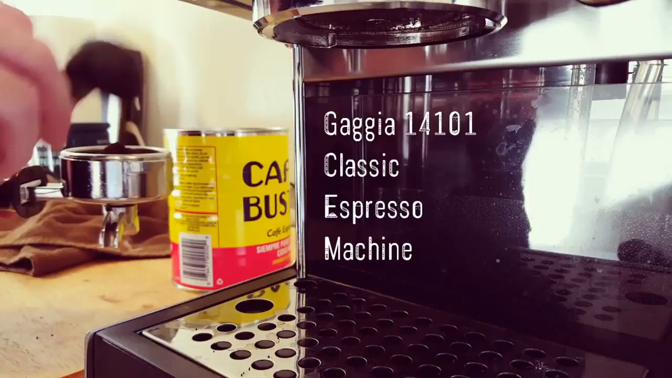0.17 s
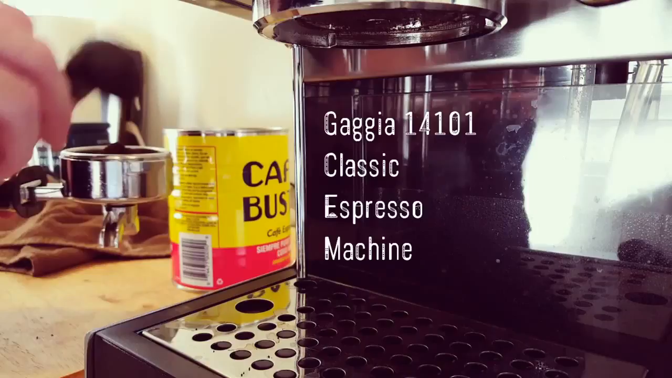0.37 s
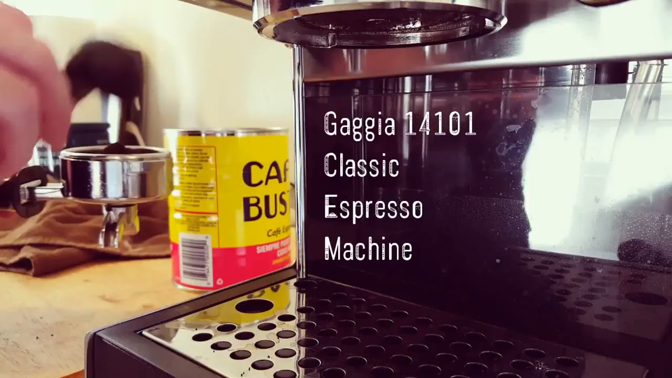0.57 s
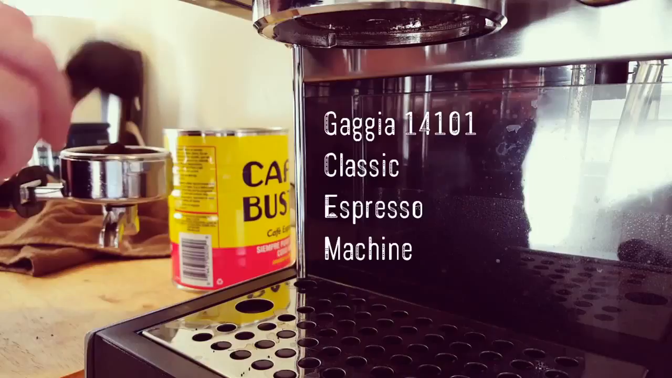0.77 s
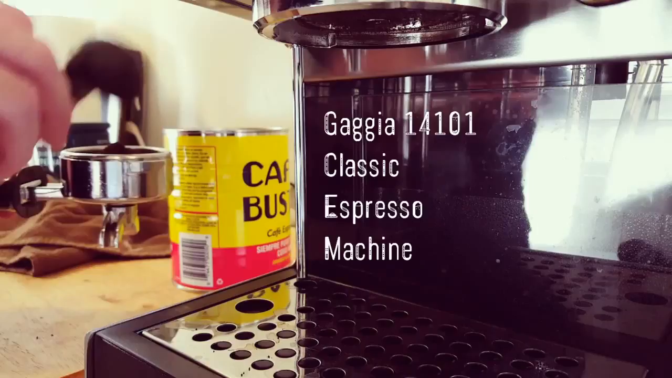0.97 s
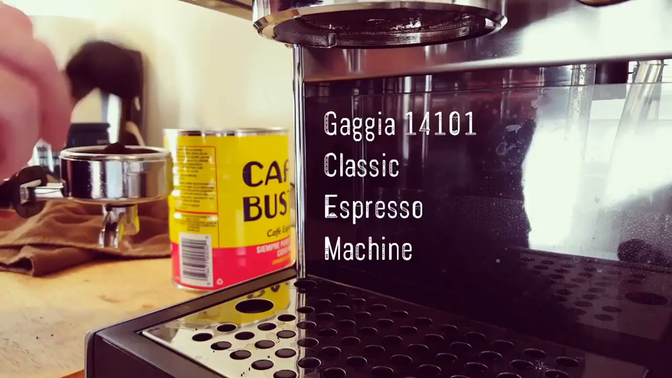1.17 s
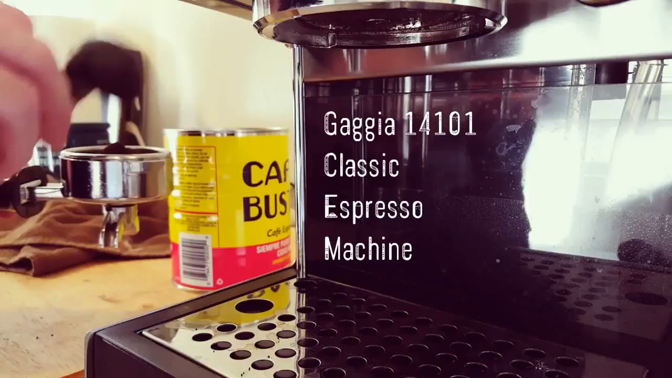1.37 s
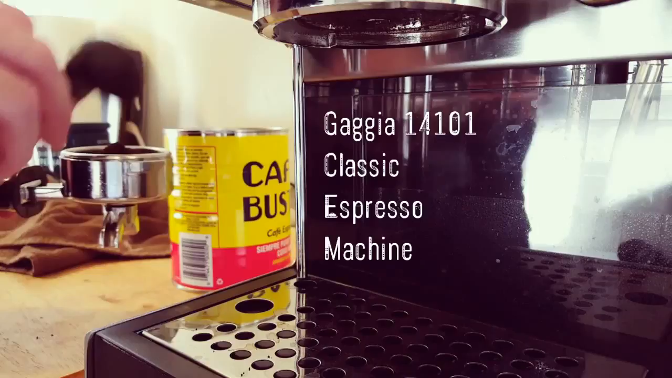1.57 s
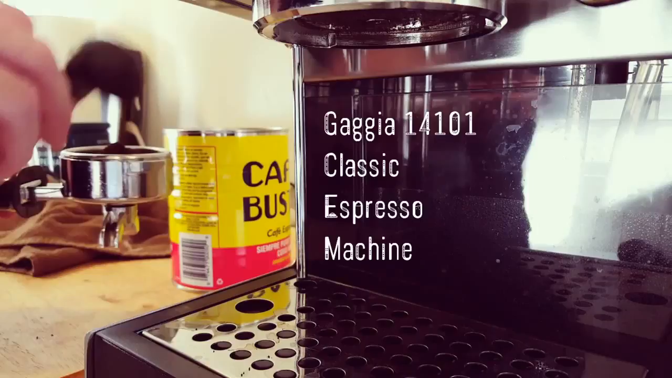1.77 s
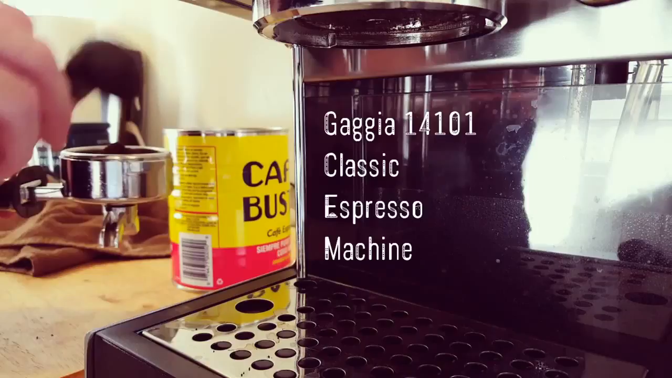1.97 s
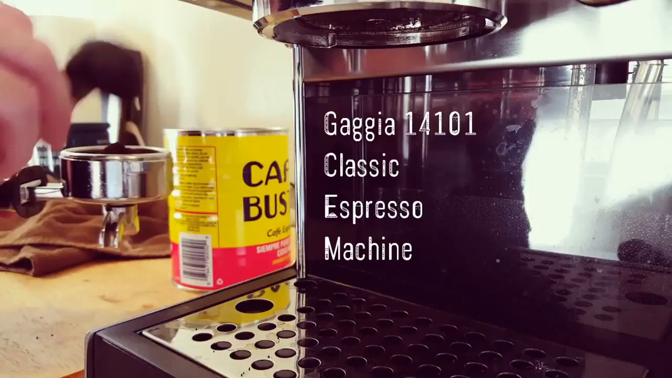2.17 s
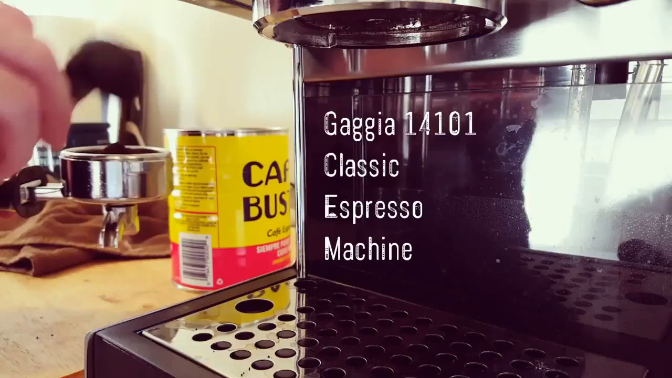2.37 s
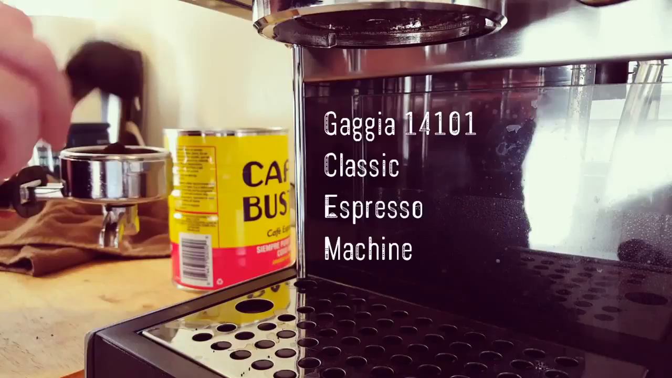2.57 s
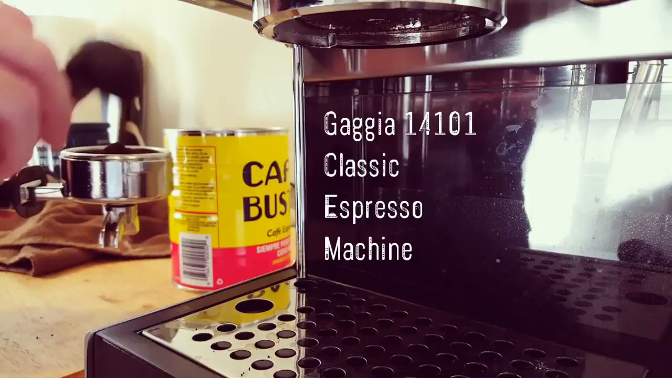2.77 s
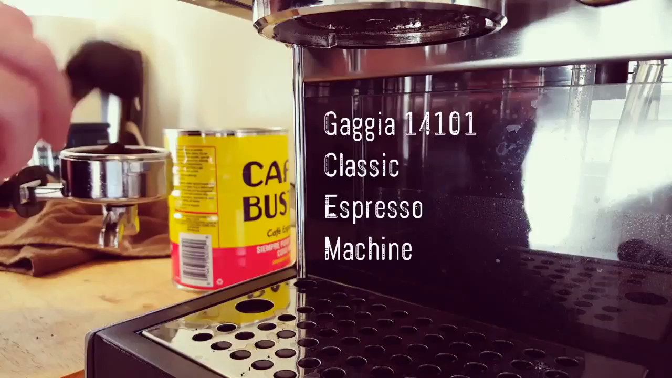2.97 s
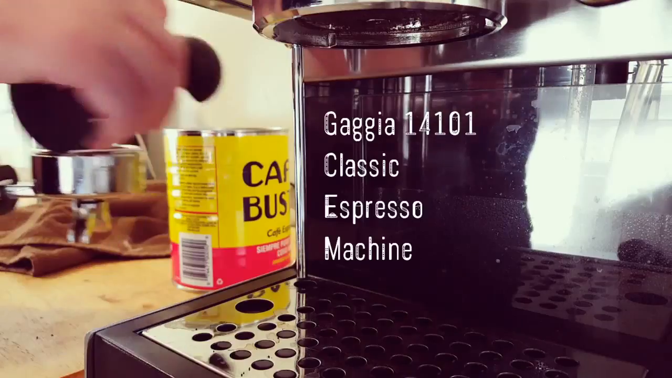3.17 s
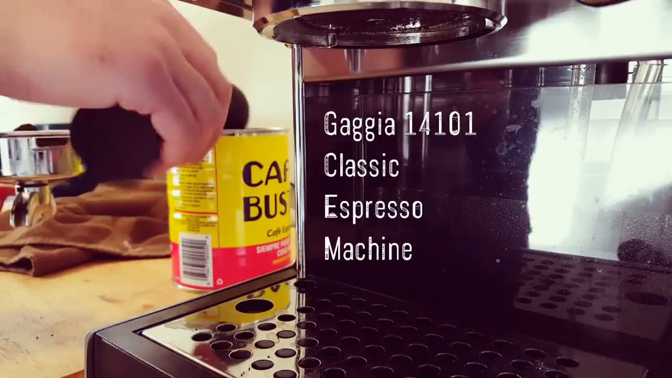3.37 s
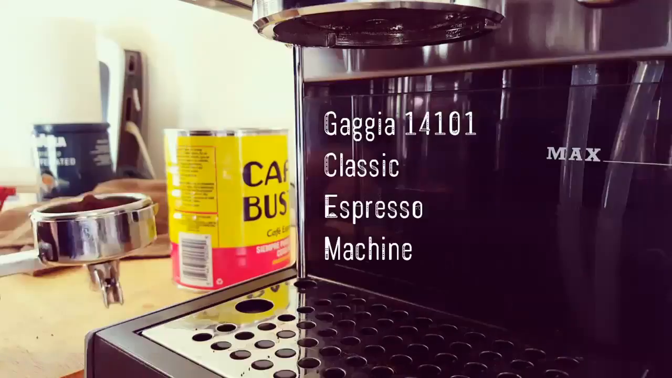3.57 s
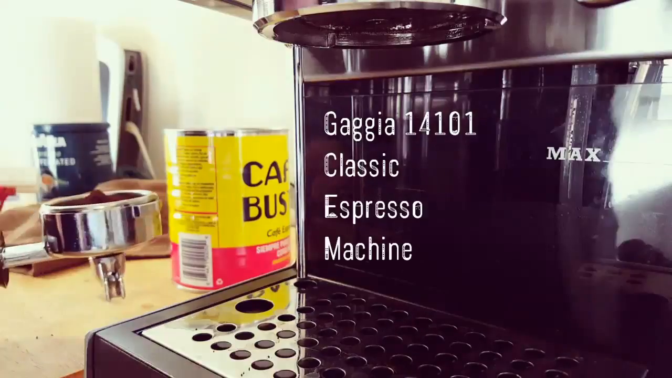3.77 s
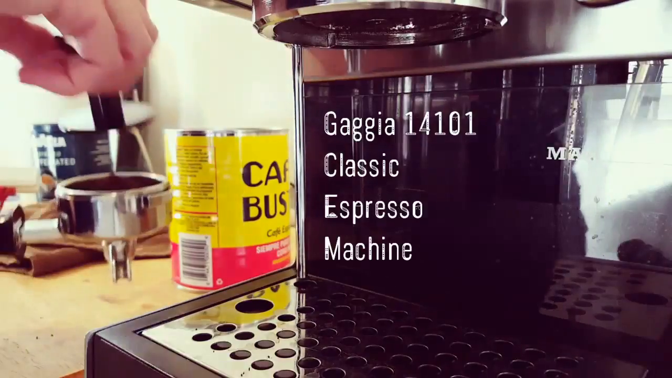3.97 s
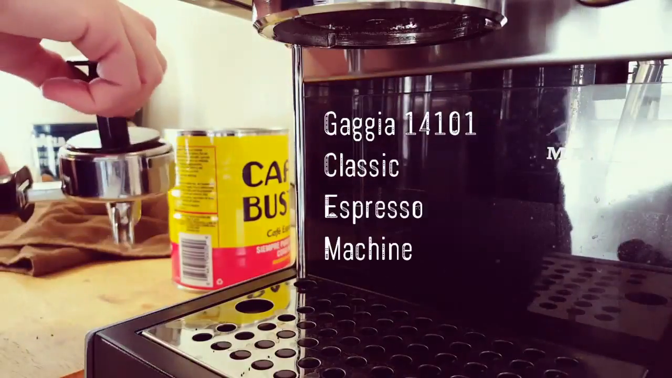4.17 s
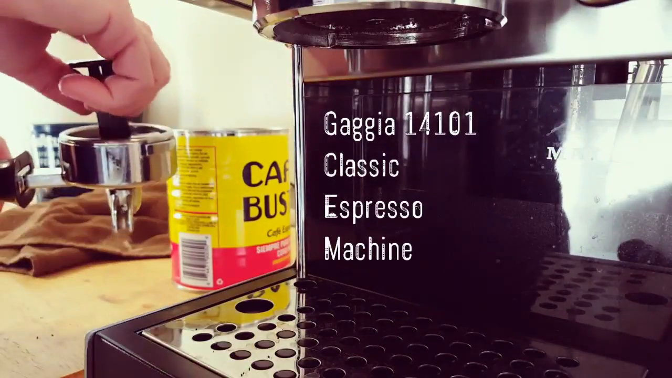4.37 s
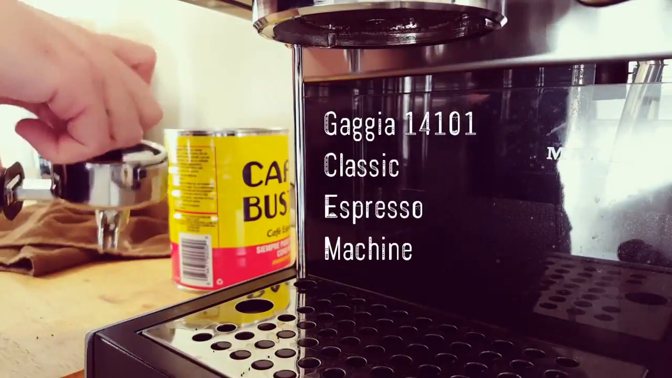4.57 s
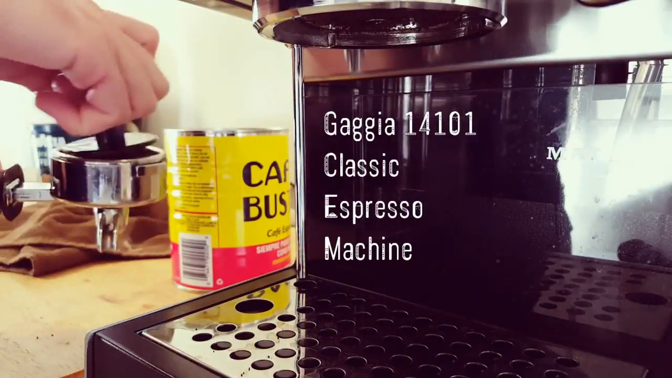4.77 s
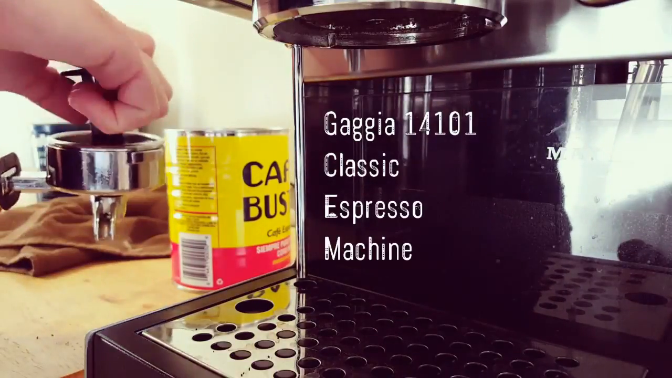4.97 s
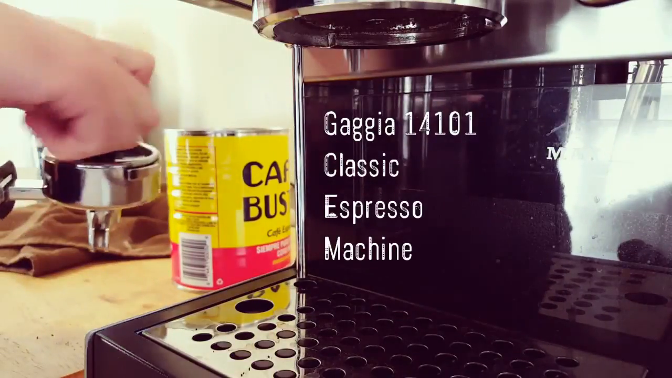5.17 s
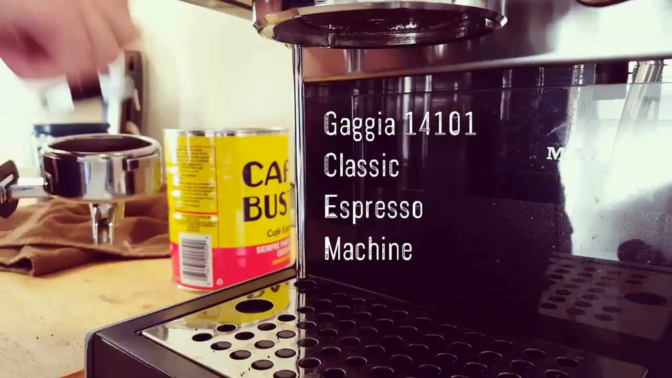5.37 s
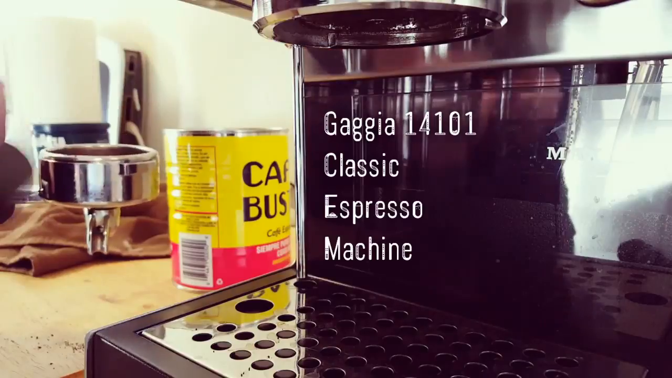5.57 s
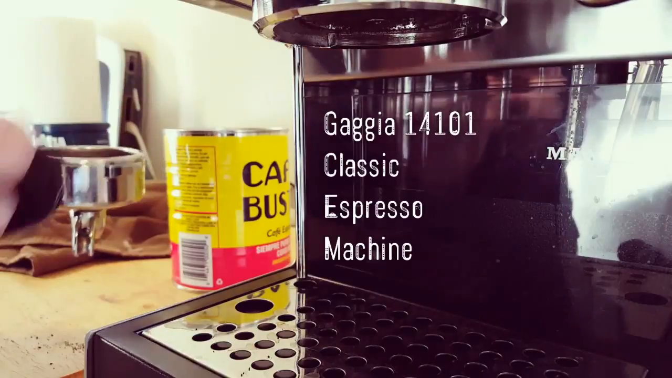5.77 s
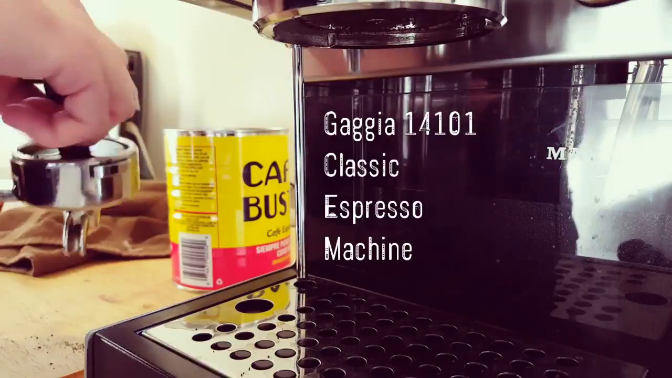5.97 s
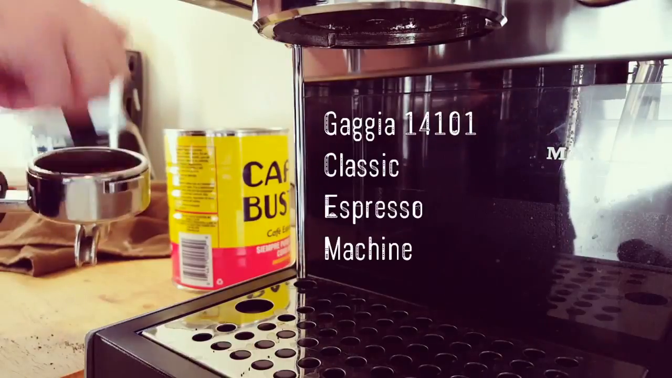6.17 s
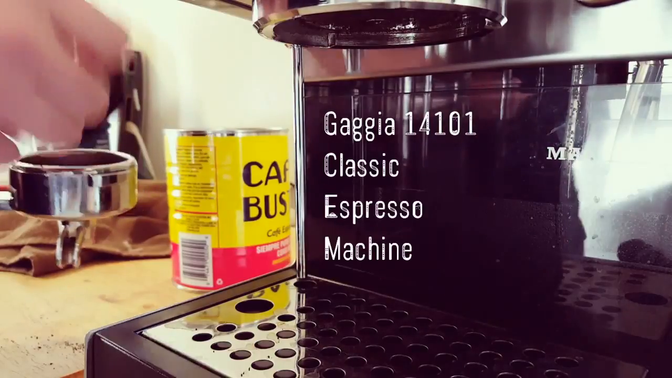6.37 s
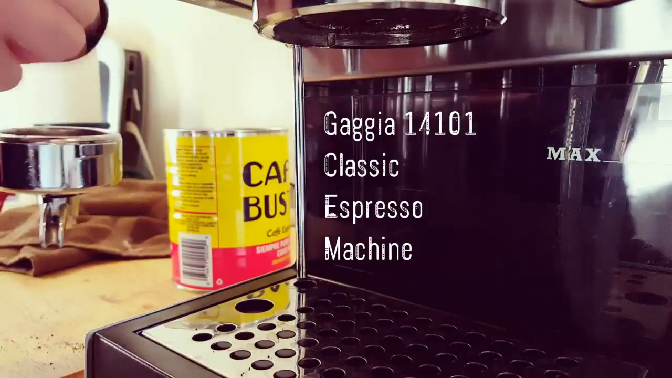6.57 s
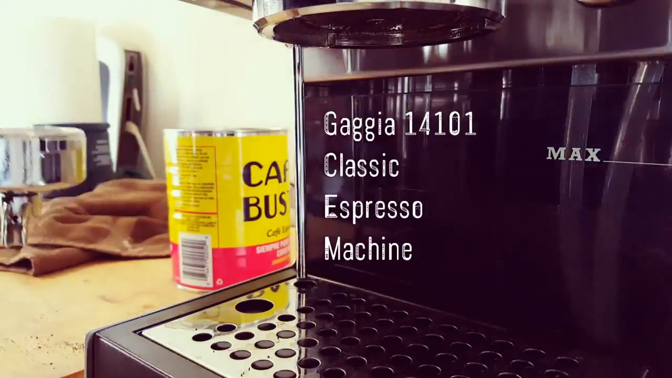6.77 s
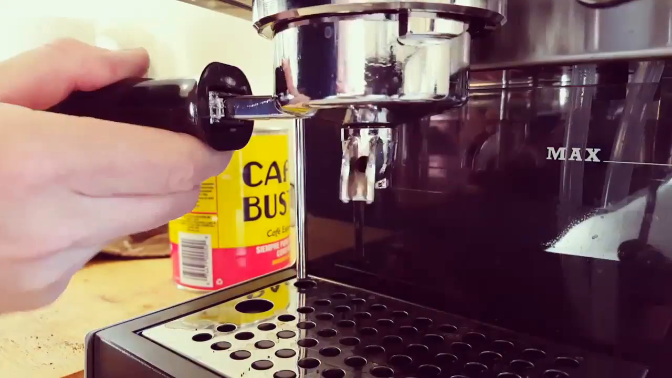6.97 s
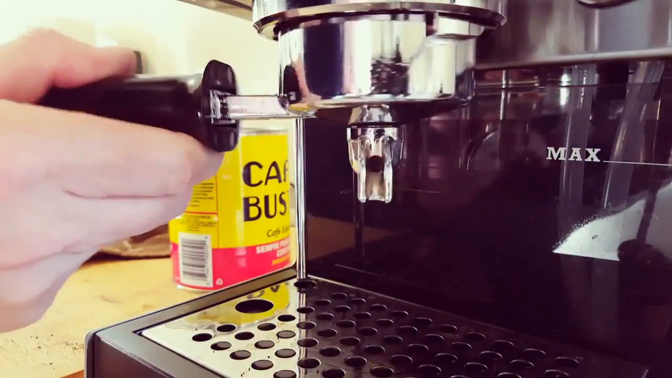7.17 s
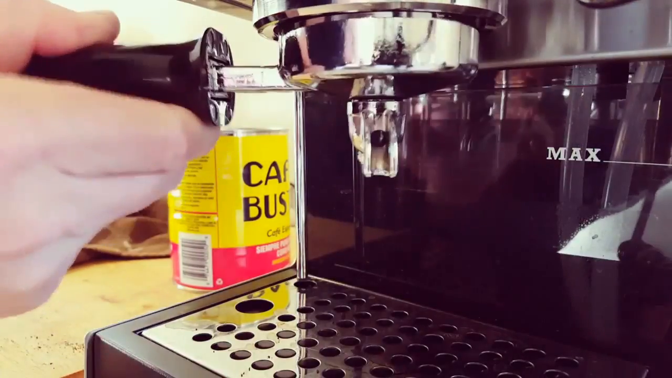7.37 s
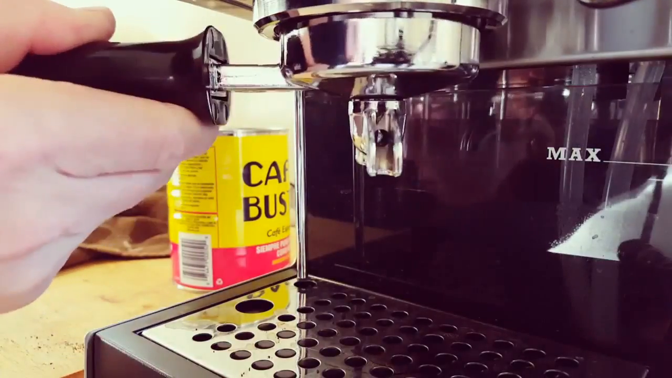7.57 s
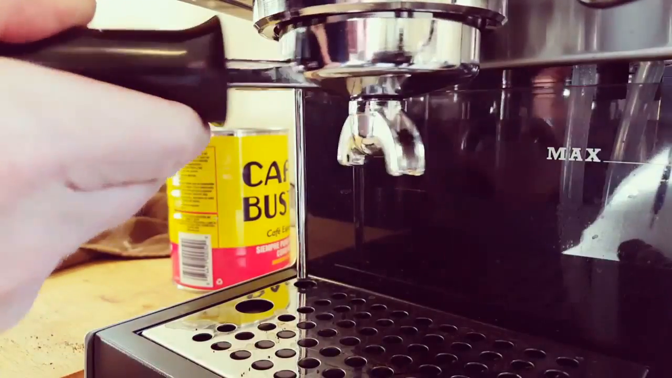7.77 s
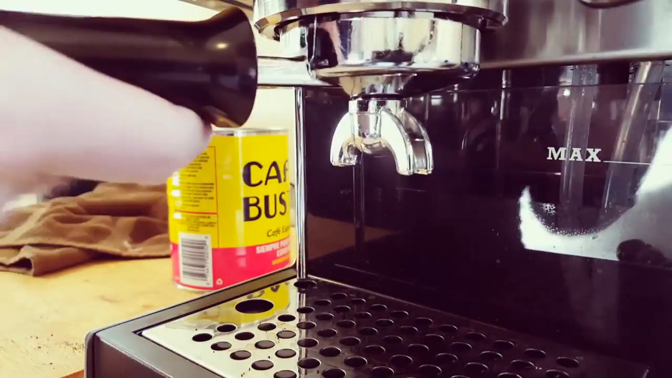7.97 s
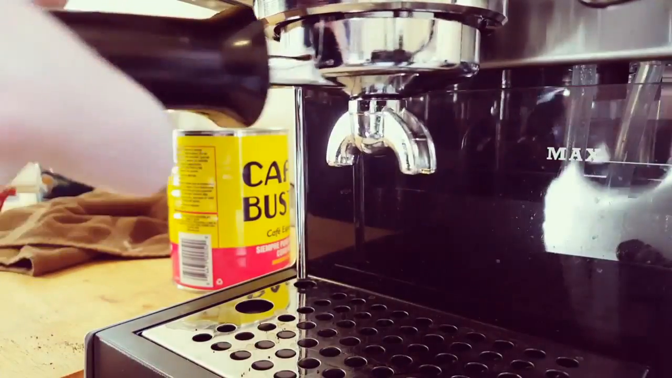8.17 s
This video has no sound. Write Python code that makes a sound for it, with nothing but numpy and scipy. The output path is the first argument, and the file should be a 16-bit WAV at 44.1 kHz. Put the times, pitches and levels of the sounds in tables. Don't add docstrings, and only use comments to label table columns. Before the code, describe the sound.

Close stereo pickup over a wooden counter: soft knocks and gritty rustles, then sharp scoop taps with a brief steel ring, growing harder and ending dull. A low drag follows, with small ticks and one bright tamper hit. The background suddenly shifts to fuller, lower air beside the machine, where heavy metal parts strike, twist with a rasp, stop hard, and get one last push. Refrigerator hum throughout.

```python
import sys
import numpy as np
from scipy import signal
from scipy.fft import rfft, irfft, next_fast_len
from scipy.io import wavfile
from scipy.ndimage import uniform_filter1d, map_coordinates

SR = 44100
rng = np.random.default_rng(int(sys.argv[2]) if len(sys.argv) > 2 else 0)


def materialize(psi):
    bounded = np.clip(np.atleast_2d(psi).T, -1, 1)
    quanta = np.round(bounded * 32767).astype(np.int16)
    wavfile.write(sys.argv[1], SR, quanta)


def gain_from_db(level_db):
    decades = np.asarray(level_db, float) / 20
    return 10 ** decades


N = 362502
TIME_S = np.arange(N) / SR
START_S, CUT_S = 0.037, 6.95
STEADY_TOP_HZ = 15870

# f/Hz, likeness [-1..1]
ALIKE = [(60, 0.58), (180, 1), (550, 0.76), (1650, 0.25), (4970, -0.12), (15000, -0.025)]


def unit(x):
    return x / np.sqrt(np.mean(x ** 2) + 1e-20)


def along(points, hz):
    f, v = np.transpose(points)
    return np.interp(np.log(hz + 1), np.log(f + 1), v)


def wobble(rate):
    knots = rng.standard_normal(int(N * rate / SR) + 4)
    return map_coordinates(knots, [np.arange(N) * rate / SR])


def filtered(x, response):
    m = next_fast_len(x.shape[-1] + 8192)
    return irfft(rfft(x, m) * response(np.fft.rfftfreq(m, 1 / SR)), m)[..., :x.shape[-1]]


def body(modes):
    def response(f):
        total = 0
        for k, (hz, width, db) in enumerate(modes):
            damping = 1j * f * abs(width)
            total = total + (-1) ** k * gain_from_db(db) * damping / (hz * hz - f * f + damping + 1e-9)
        return total
    return response


def twice(modes):
    return lambda f: sum(body([(hz, 1.5 * width, 0)])(f) ** 2 * gain_from_db(db) for hz, width, db in modes)


def strokes(rows, rise, fall):
    gain = 0
    for s, hold, db in rows:
        early = np.clip(s - TIME_S, 0, None)
        past = np.clip(TIME_S - s - hold, 0, None)
        gain = gain + gain_from_db(db - rise * early - fall * past)
    return gain


def spread(pair, alike):
    def mix(hz):
        turn = np.arccos(np.clip(along(alike, hz), -1, 1)) / 2
        return np.array([np.cos(turn), np.sin(turn)])
    mid, side = filtered(pair, mix)
    return np.array([mid + side, mid - side])


def noise(response, alike, grain_db):
    grit = gain_from_db(grain_db * wobble(220))
    rough = filtered(grit * rng.standard_normal((2, N)), lambda f: response(f) * (f < STEADY_TOP_HZ))
    return unit(spread(rough, alike))


# f/Hz, t60/s
WALLS = [(200, 0.13), (1000, 0.19), (4000, 0.15), (9000, 0.14), (16000, 0.11)]


def room_tail(onset_s):
    n = SR // 4
    hz, t, z = signal.stft(rng.standard_normal((2, n)), SR, nperseg=128)
    decay = gain_from_db(-60 * t / along(WALLS, hz)[:, None])
    tail = signal.istft(z * decay, SR, nperseg=128)[1][:, :n]
    tail = spread(tail * (1 - np.exp(-np.arange(n) / SR / onset_s)), ALIKE)
    return tail / np.linalg.norm(tail[0])


# left delay/s, right delay/s, level/dB
ECHOES = [
    (.00068, .00064, -10),
    (.0014, .0012, -10),
    (.0037, .0039, -12),
]


def add(out, s, db, tail_db, response, lead_s, beam=(5000, 1000, -40)):
    size = 2 ** 14
    hz = np.fft.rfftfreq(size, 1 / SR)
    left_s, right_s, echo_db = np.transpose(ECHOES)
    echoes = gain_from_db(echo_db + rng.normal(0, 1.5, (2, len(ECHOES))))
    paths = [1 + gains @ np.exp(-2j * np.pi * np.outer(lags, hz))
             for gains, lags in zip(echoes, (left_s, right_s))]
    paths = paths * np.exp(-2j * np.pi * np.outer([0, lead_s], hz))
    paths = paths * (1 + body([beam])(hz)) / (1 + 1j * hz / 11000)
    steady = hz < STEADY_TOP_HZ
    t = np.arange(SR // 20) / SR
    scatter = rng.standard_normal((2, len(t))) * gain_from_db(-60 * t / 0.0126) * (t > .0012)
    scatter = spread(scatter, ALIKE)
    scatter = rfft(scatter / np.linalg.norm(scatter[0]), size)
    paths = paths + gain_from_db(-7) * steady * hz / (hz - 5000j) * scatter
    paths = paths + gain_from_db(tail_db) * steady * rfft(room_tail(onset_s=0.006), size)
    ring = response(hz)
    sound = irfft(paths * ring) / abs(irfft(ring)).max()
    spot = out[:, round(s * SR):][:, :SR // 3]
    spot += gain_from_db(db) * sound[:, :spot.shape[1]]


def hum(lines, sway_db):
    out = np.zeros((2, N))
    for hz, db in lines:
        loose = 0.6 + 0.42 / (1 + (hz / 1100) ** 2)
        phase = 2 * np.pi * hz * TIME_S + 2.1 * loose ** 2 * wobble(8) + rng.uniform(0, 6.76)
        apart = rng.normal(0, 1.0) * hz / 1500
        level = gain_from_db(db + 2.0 + sway_db * loose * wobble(9))
        out += level * np.sin(phase + np.array([[0], [apart]]))
    return out


# f/Hz, level/dB rms
HUM = [(209.9, -60), (236.9, -53), (285.3, -53.5), (355.3, -61.5), (425.3, -61), (473.7, -58.5),
       (721.4, -61.5), (829.0, -62), (1061, -66), (1157, -66.5), (1647, -69.5), (2239, -94), (2724, -66),
       (2945, -81), (3887, -77)]
HUM_LATE = [(140.0, -53), (177.6, -73), (527.6, -85), (823.6, -66.5), (1362, -68), (2094, -83)]
# f/Hz, width/Hz, level/dB
BUZZ = [(117.3, 6.7, -1.5), (1165, 84, -2), (1655, 48, -16), (2750, 160, -33)]
# f/Hz, level/dB per Hz
AIR = [(12, -65), (20, -9.5), (29, -33), (108, -21), (174, -16.5), (224, -8.5), (281, -5), (382, -9),
       (465, -12.5), (709, -10), (1510, -21.5), (2660, -23), (3520, -28), (8000, -33), (9500, -38),
       (15200, -36.5), (15900, -44), (16300, -77)]
AIR_LATE = [(12, -61), (20, -27), (143, 1), (281, -6), (479, -10), (551, -7.5), (750, -18.5), (1320, -19),
            (1690, -25.5), (2060, -24.5), (2890, -27.5), (12500, -44.5), (15800, -46), (16300, -72)]
# f/Hz, likeness [-1..1]
ALIKE_LATE = [(60, 0.98), (180, 0.96), (550, 0.56), (1650, -0.31), (4970, -0.18), (15000, 0.3)]
# t/s, level/dB
SETTLING = [
    (6.95, 1.5),
    (7.3, 0),
    (7.6, -1),
    (7.95, 0),
    (8.22, -0.5),
]


def kitchen():
    late = np.clip((TIME_S - CUT_S) / 0.0034, 0, 1)
    air = noise(lambda f: gain_from_db(along(AIR, f)), ALIKE, grain_db=1.0)
    first = gain_from_db(-49.5 + .4 * wobble(3)) * air + hum(HUM, sway_db=2.0)
    first += gain_from_db(-60.0) * noise(twice(BUZZ), ALIKE, grain_db=4.0)
    air = noise(lambda f: gain_from_db(along(AIR_LATE, f)), ALIKE_LATE, grain_db=1.5)
    settling_db = np.interp(TIME_S, *np.transpose(SETTLING))
    second = gain_from_db(-45.5 + settling_db + 0.65 * wobble(2.98)) * air + hum(HUM_LATE, sway_db=-3)
    return (1 - late) * first + late * second


# t/s, hold/s, level/dB
RUSTLE = [(.05, .005, -53), (.27, .005, -59), (1.25, 0.11, -70), (1.6, .02, -77), (1.71, 0.11, -61),
          (3.8, 0.14, -56.5), (4.02, 0.067, -62), (4.16, .02, -75), (4.61, 0.018, -61), (4.745, .01, -59),
          (5.17, 0.02, -56), (5.28, .015, -56), (6.12, .005, -64), (6.165, 0.039, -56.5),
          (6.31, 0.027, -58), (7.66, .005, -63), (7.72, 0.092, -62.5), (7.9, 0.068, -54.5),
          (8.05, 0.018, -61), (8.12, 0.14, -66.5)]
# f/Hz, level/dB per Hz
RUSTLE_COLOUR = [(2000, 2), (4000, -1.5), (6500, 1.5), (9500, -7.5), (13000, -4), (15500, -14),
                 (16200, -40)]


def rustle():
    rub = strokes(RUSTLE, rise=260, fall=280)
    return rub * noise(lambda f: gain_from_db(along(RUSTLE_COLOUR, f)), ALIKE, grain_db=2.5)


# t/s, peak level/dB
KNOCKS = [
    (0.089, -35),
    (0.099, -39),
    (0.112, -33),
    (0.1768, -23.5),
    (0.1808, -28),
    (0.204, -37),
    (0.281, -35.5),
    (1.6005, -25.5),
    (1.604, -36),
]
# f/Hz, width/Hz, level/dB
COUNTER = [(318, 71, -4), (453, 77, 2), (707, 79, -3.5), (864, 150, -5.5), (1160, 82, -34),
           (1950, 150, -10)]
# t/s, hold/s, level/dB
SLIDE = [
    (3.658, .02, -44),
    (3.69, 0.042, -32.5),
    (3.775, 0.031, -34),
    (3.86, 0.089, -43.5),
    (4.05, 0.019, -46.5),
]
# f/Hz, width/Hz, level/dB
SLIDE_BODY = [(213, 37, -10), (269.4, 16, -3), (303, 35, -5), (360, 76, -18)]


def counter():
    out = np.zeros((2, N))
    soft = lambda f: body(COUNTER)(f) / (1 + 1j * f / 1500)
    for s, db in KNOCKS:
        add(out, s, db, -6, soft, 6e-5)
    drag = strokes(SLIDE, rise=910, fall=270)
    main = noise(twice(SLIDE_BODY), ALIKE, grain_db=0)
    upper = noise(twice([(634.0, 240, 3), (720, 230, -2), (1170, 1100, -13.5)]), ALIKE, grain_db=4.0)
    lower = noise(twice([(130, 82, 0)]), ALIKE, grain_db=0)
    return out + drag * (main + gain_from_db(-11.5) * upper) + gain_from_db(-34.0) * drag ** 0.5 * lower


# t/s, peak level/dB, ring f/Hz, low body level/dB
TICKS = [(0.1273, -31.5, 5900, 9), (0.264, -34.5, 5800, 18), (0.2834, -49, 3880, -8),
         (1.227, -42, 7860, -6), (1.6, -47, 3840, -6.5), (3.8094, -45, 5010, -10), (4.2535, -30, 6070, 1.5),
         (4.3554, -41.5, 5840, -8), (4.742, -37, 5800, -16), (4.8608, -29.5, 6400, -32),
         (5.4395, -48, 5680, -6), (6.2362, -36, 9000, -14)]
PINGS = [
    (0.4932, -30, 5000, 18),
    (0.5254, -37, 5060, 12),
    (3.926, -28, 4380, -18),
    (7.3295, -38, 13000, -30),
    (7.333, -40, 12700, -30),
]
LUG_TICKS = [(7.0305, -40, 5550, -13), (7.045, -61, 5500, -9), (7.138, -50, 6000, -14),
             (7.308, -41, 6000, -14), (7.32, -44, 5800, -10), (7.3292, -35, 5550, -7),
             (7.3325, -33, 5600, -2), (7.337, -35, 3200, -10), (7.347, -36, 5500, 0),
             (7.3545, -44, 4000, -6), (7.3834, -42, 8200, -12), (7.3925, -40, 7500, -2),
             (7.396, -42, 7600, -4), (7.4055, -28, 6000, -14), (7.409, -40, 8500, -8),
             (7.4225, -21, 4800, -12), (7.4265, -30, 6500, -14), (7.4365, -38, 5500, -4)]


def ticks():
    out = np.zeros((2, N))
    # rows, ring width/Hz, left port lead/s, treble/dB, treble per force (dB/dB), room tail/dB
    kinds = ((TICKS, 2600, 1.4e-4, -16, .55, -3.5),
             (PINGS, 450, 1.4e-4, -24, -.4, -6),
             (LUG_TICKS, 900, 1e-4, -20, .1, -7))
    for rows, width_hz, lead_s, treble_db, hardens, tail_db in kinds:
        for s, db, hz, low_db in rows:
            force_db = db + 35
            ring = twice([(1900, 1600, low_db), (3500, 1200, low_db - 6.5), (hz, width_hz, 0),
                          (12000, 4000, treble_db + hardens * force_db)])
            add(out, s, db + 4.5, tail_db - 0.5 * force_db, ring, lead_s)
    return out


# t/s, peak level/dB, ring level/dB, favoured f/Hz, its lift/dB
TAPS_F = [
    (0.4612, -17.5, 0, 2200, 0.33),
    (0.4851, -21.5, 0, 4200, 2.2),
]
TAPS_A = [
    (0.7776, -10, -6, 5200, 1),
    (0.8535, -9, 4.5, 5240, -12),
    (0.9291, -6, 2, 3970, -5.5),
]
TAPS_B = [
    (2.4902, -20, 0, 4400, -14),
    (2.654, -23, 0, 5000, -16),
    (2.7167, -22, 0, 5000, -42),
    (2.799, -10.5, 0, 5260, -4),
    (2.8782, -9, 0, 5000, 1),
    (2.9588, -6.5, 0, 5000, 3),
]
TAPS_E = [
    (3.0479, -6, 0, 5000, -3),
]
TAPS_C = [
    (3.3497, -7, -1.4, 2600, -11),
    (3.4536, -8.5, 0.36, 2800, -13),
    (3.5597, -4.5, 0, 3300, -6),
]
TAPS_D = [
    (6.052, -10.5, 1.5, 5900, 1),
    (6.2556, -28, -8, 2850, 5),
]
# f/Hz, width/Hz, level/dB
SCOOP_F = [(1190, 1400, 1.5), (2050, 880, 8.5), (3300, 1050, 3), (4800, 1000, 5), (6300, 1400, -3.5),
           (9900, 4000, -14)]
SCOOP_A = [(1196, 1500, -12.5), (2440, 790, -7.5), (4280, 1040, -1), (5330, 840, 0.5), (7660, 710, -6.5),
           (8500, 900, -7.5), (11100, 4000, -12.5)]
SCOOP_B = [(1310, 2200, -3), (2740, 1340, 3), (4380, 1600, 3), (5610, 570, 6.5), (6850, 590, -4.5),
           (12700, 3100, -11.5), (16100, 1500, -30)]
SCOOP_E = [(1375, 4800, -11.5), (2800, 1600, -2), (4400, 1330, -1.5), (5310, 610, 1.5), (6560, 1170, -5),
           (9500, 2400, -11.5), (12200, 3900, -12.5), (15500, 1200, -31)]
SCOOP_C = [(390, 70, 8.5), (810, 310, 5), (1320, 1060, -2.5), (1620, 170, 5), (2150, 550, 8),
           (2800, 1180, 3), (3990, 850, 3.5), (4970, 1150, 6), (6270, 760, 6.5), (7450, 2130, 5),
           (9250, 4000, 1), (15600, 2100, -1)]
TAMPER = [(2000, 800, -5.5), (4080, 400, 1.5), (5800, 1700, 0.5), (7670, 3400, -7), (10940, 1000, 1.5)]
# f/Hz, width/Hz, level/dB
RING_F = [(1940, 43, -20), (4200, 60, -3), (5000, 15, 11), (6100, 80, -9)]
RING_A = [(3840, 42, 1), (4190, 51, 2), (4480, 35, -7), (4890, 22, 1), (4950, 45, -3), (5500, 45, -16),
          (5835, 38, -3), (6060, 70, -9), (7350, 110, -14)]
RING_B = [(1424, 31, -4.5), (3600, 66, -13), (3995, 68, 5.5), (4020, 45, -7), (4540, 36, -7),
          (5000, 60, -15), (5680, 91, -4.5), (6300, 52, -4.5)]
RING_C = [(856, 20, 1), (1826, 44, 5), (2140, 8.3, 4), (2223, 17, 10.5), (2537, 16, 10), (2760, 25, 1),
          (2770, 40, 8), (3250, 30, 1), (3600, 52, 10), (4080, 60, -6), (5030, 40, -15)]
RING_D = [(2891, 45, 7), (4400, 20, -2), (5800, 25, 3), (5840, 12, 2), (6270, 27, -7), (6840, 28, -10),
          (7460, 34, -2), (10900, 130, -14)]
# f/Hz, width/Hz, level/dB
BEAM_A, BEAM_B = (5480, 670, 0.95), (5300, 1150, 1.9)
BEAM_C, BEAM_D = (2120, 560, 6), (6800, 2000, 1.4)


def taps():
    out = np.zeros((2, N))
    # rows, click, ring, left port lead/s, room tail/dB, beam
    series = ((TAPS_F, SCOOP_F, RING_F, 1.4e-4, -8, BEAM_F_OR_D := BEAM_D),
              (TAPS_A, SCOOP_A, RING_A, 1.5e-4, -4.5, BEAM_A),
              (TAPS_B, SCOOP_B, RING_B, 1.25e-4, -7, BEAM_B),
              (TAPS_E, SCOOP_E, RING_B, 1.25e-4, -6, BEAM_D),
              (TAPS_C, SCOOP_C, RING_C, .9e-4, -4, BEAM_C),
              (TAPS_D, TAMPER, RING_D, 1.3e-4, -8, BEAM_D))
    for rows, click, ring, lead_s, tail_db, beam in series:
        for s, db, ring_db, hz, lift_db in rows:
            struck = np.add(ring, [[0, 0, ring_db + z] for z in rng.normal(0, 2, len(ring))])
            struck[:, 0] *= 1 + .006 * rng.standard_normal(len(ring))
            treble = gain_from_db(4.5 + db)

            def blow(f):
                sharp = (1 + treble * 1j * f / 6000) / (1 + 1j * f / 6000) * f / (f - 250j)
                favour = 1.5 + body([(hz, 0.19 * hz, lift_db)])(f)
                return (body(click)(f) + body(struck)(f)) * sharp * favour

            add(out, s, db + 4.5, tail_db, blow, lead_s, beam)
    return out


# t/s, peak level/dB, boom level/dB, bare metal level/dB, favoured f/Hz
THUDS = [(6.953, -20.5, -18, -23.5, 520), (7.03, -11, -12.5, -33, 950), (7.034, -12.5, -24, -35, 520),
         (7.044, -27, -33, -22, 623), (7.081, -30, 4, -17, 600), (7.117, -20.5, -24, -30, 750),
         (7.133, -19, -12, -40, 620), (7.15, -36, -20, -35, 550), (7.291, -23.5, -25, -19, 710),
         (7.3, -19, -6, -16, 850), (7.315, -21.5, -15, -24, 420), (7.33, -3.5, -12.5, -35, 780),
         (7.342, -8, -9, -31, 590), (7.354, -10, 1, -16, 398), (7.381, -19, 18, -30, 360),
         (7.394, -17, 1, -13, 600), (7.405, -16.5, -19, -2, 700), (7.412, -20, -19, -15, 900),
         (7.423, -3, -22, -19.5, 740), (7.4367, -17, -24, -24, 600), (7.8617, -13, -15, -22, 745),
         (7.8659, -22, -13, -24, 632), (7.874, -21, -7, -20, 504), (7.889, -26, -23, -35, 360)]
# f/Hz, width/Hz, level/dB
HOUSING = [(364.4, 28, 9.5), (503, 51, 1), (597, 13.3, 4.5), (690, 93, -2), (820, 173, -1),
           (1057, 270, -7.5)]
BASE = [(91.6, 11, 4), (145.3, 23, 2.5), (182.4, 14, 0.5), (230, 31, -5.5)]
PANEL = [(1296, 59, 8), (1470, 110, 3.5), (1830, 140, 3), (2010, 140, 3)]
GROUP_STEEL = [(2480, 270, 17), (2200, 1450, 13), (5900, 2300, 9), (7860, 2800, -10), (12200, 1700, 6.5)]
COLLAR = [(1970, 43, -9), (2530, 17, 5), (2755, 48, 4.5), (3220, 60, -3), (5550, 100, -8)]
# t/s, hold/s, level/dB
TWIST = [
    (6.955, 0.01, -37),
    (7.035, 0.0085, -47),
    (7.118, 0.013, -40),
    (7.297, 0.034, -32),
    (7.332, 0.006, -25),
    (7.346, .014, -33),
    (7.394, 0.01, -45),
    (7.422, 0.0066, -23.5),
    (7.872, 0.0067, -33),
]
# t/s, hold/s, level/dB
SHAKE = [
    (7.3, 0.14, -45.5),
    (7.875, 0.04, -49),
]
# t/s, hold/s, level/dB, treble level/dB
SLIPS = [(6.952, .008, -50, -11), (7.031, 0.0099, -45.5, -16), (7.122, 0.013, -53.5, -9),
         (7.288, 0.018, -48, -17), (7.313, .005, -41, -11), (7.3295, .005, -34.5, -4.5),
         (7.345, .011, -39, -14), (7.38, .003, -48, 0), (7.39, .004, -30.5, -15), (7.398, .008, -40, -8),
         (7.421, .004, -39, -8), (7.44, 0.034, -60, -7), (7.48, 0.073, -59, -9), (7.86, 0.005, -43, -7)]
# f/Hz, likeness [-1..1]
ALIKE_NEAR = [(60, 0.99), (180, 0.84), (550, 0.85), (1650, 0), (4970, 0.094), (15000, 0)]


def machine():
    out = np.zeros((2, N))
    base, panel, steel, collar = twice(BASE), twice(PANEL), twice(GROUP_STEEL), body(COLLAR)
    housing = lambda f: body(HOUSING)(f) / (1 + 1j * f / 1300) ** 2
    peak = lambda part: abs(irfft(part(np.fft.rfftfreq(8192, 1 / SR)))).max()
    for s, db, boom_db, metal_db, hz in THUDS:
        spot = lambda f: housing(f) * body([(hz, 0.87 * hz, 0)])(f)
        parts = ((spot, 0), (base, boom_db - 4.0), (steel, metal_db + 7.5),
                 (panel, metal_db + 6.5), (collar, metal_db + 0.5))
        blow = lambda f: sum(gain_from_db(part_db) / peak(part) * part(f) for part, part_db in parts)
        add(out, s, db - 7.0, -8, blow, 1.2e-4)

    grind = strokes(TWIST, rise=1040, fall=285)
    shake = strokes(SHAKE, rise=1040, fall=81) + gain_from_db(-5.5) * grind
    out += grind * noise(housing, ALIKE_NEAR, grain_db=4.0)
    out += shake * noise(base, ALIKE_NEAR, grain_db=0)

    dull = strokes([row[:-1] for row in SLIPS], rise=11000, fall=450)
    bright_rows = [(s, hold, db + treble_db) for s, hold, db, treble_db in SLIPS]
    bright = strokes(bright_rows, rise=11000, fall=1400)
    rasp = noise(twice(GROUP_STEEL[:2]), ALIKE_NEAR, grain_db=4.0)
    rasp = rasp + gain_from_db(1.0) * noise(panel, ALIKE_NEAR, grain_db=3.0)
    rasp = unit(rasp + gain_from_db(-12) * noise(twice(COLLAR), ALIKE_NEAR, grain_db=6))
    hiss = noise(twice(GROUP_STEEL[2:]), ALIKE_NEAR, grain_db=0)
    return out + dull * rasp + bright * hiss


# f/Hz, left over right level/dB
PORTS = [(60, -2.5), (180, 0.5), (550, 1), (1650, 2), (4970, -2), (15000, 0.5)]
TAP_PORTS = [(60, -5), (550, 0), (1200, 3), (2200, 1.5), (4970, 0.5), (15000, -3)]


def scene():
    def ports(x, balance):
        return filtered(x, lambda f: gain_from_db(np.outer([.5, -.5], along(balance, f))))
    room = kitchen()
    near = ports(rustle() + counter() + machine(), PORTS)
    return room + near + ports(ticks() + taps(), TAP_PORTS)


# from t/s, to t/s, above f/Hz
STARVED = [
    (.465, .476, 8300),
    (.842, .851, 7000),
    (.92, .9255, 6500),
    (2.868, 2.874, 7000),
    (2.948, 2.954, 4500),
    (3.034, 3.043, 6500),
    (3.333, 3.345, 3700),
    (3.44, 3.448, 4900),
    (3.547, 3.556, 3600),
    (7.341, 7.35, 8800),
]


def starved(x):
    out = x.copy()
    for start_s, end_s, hz in STARVED:
        near = slice(round((start_s - .01) * SR), round((end_s + .004) * SR))
        t = np.arange(near.start, near.stop) / SR
        gap = uniform_filter1d(1. * (t > start_s) * (t < end_s), size=90)
        out[:, near] -= gap * filtered(x[:, near] * (t < end_s + .002), lambda f: f > hz)
    return out


def top_cut(x):
    return signal.sosfilt(signal.butter(12, 16810, fs=SR, output="sos"), x)


def record(dry):
    x = dry / (1 + abs(dry / .92) ** 8) ** (1 / 8)
    x = filtered(x, lambda f: (1j * f / (1j * f + 22)) ** 2 / np.sqrt(1 + (f / 16500) ** 60))
    mix = (starved(x) - .0006) * (np.arange(N) > START_S * SR)
    return top_cut(mix)


dry = scene()
out = record(dry)
materialize(out)
```